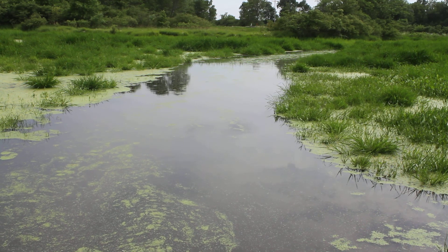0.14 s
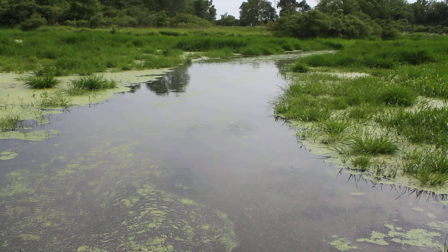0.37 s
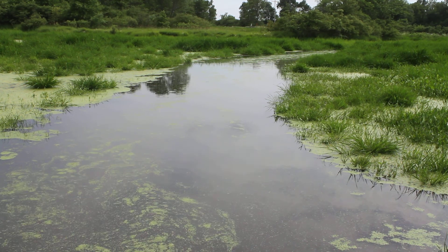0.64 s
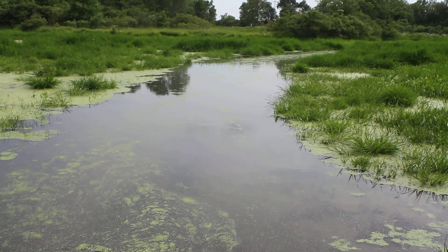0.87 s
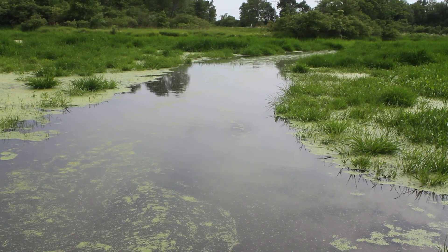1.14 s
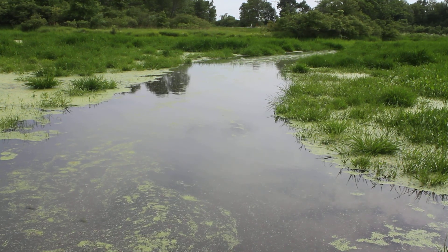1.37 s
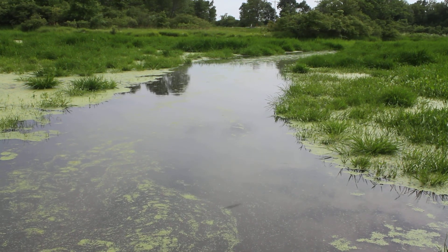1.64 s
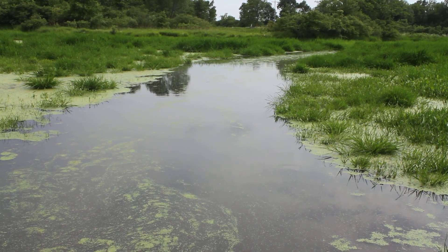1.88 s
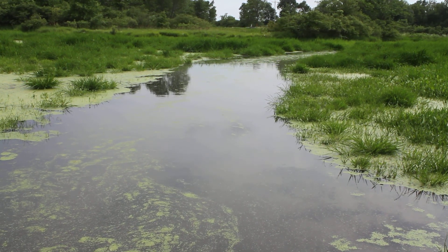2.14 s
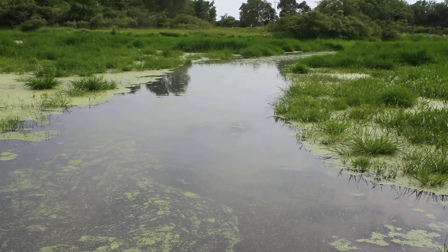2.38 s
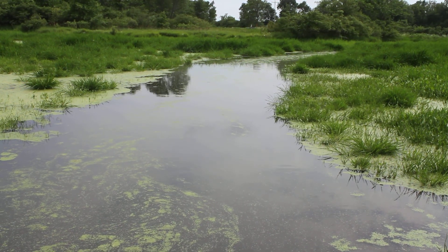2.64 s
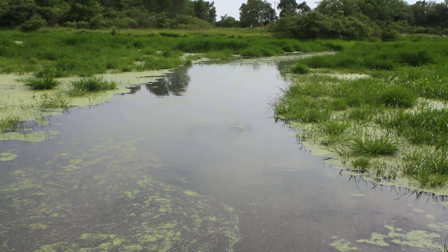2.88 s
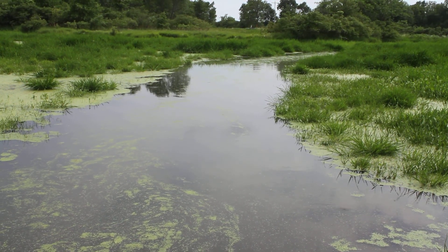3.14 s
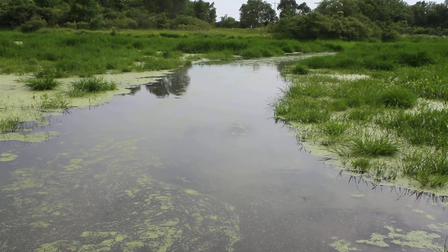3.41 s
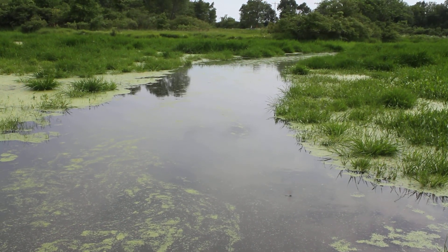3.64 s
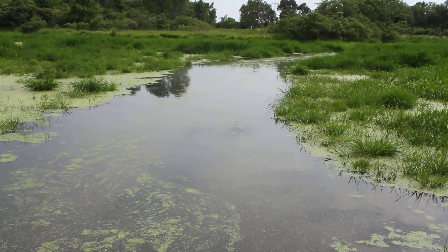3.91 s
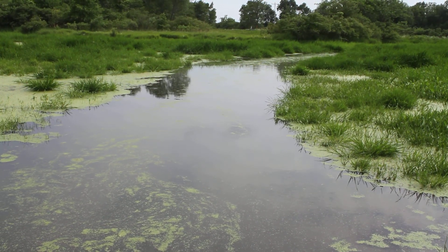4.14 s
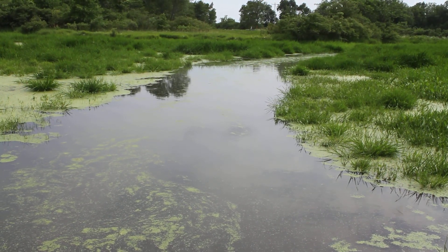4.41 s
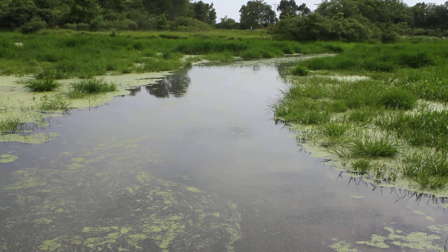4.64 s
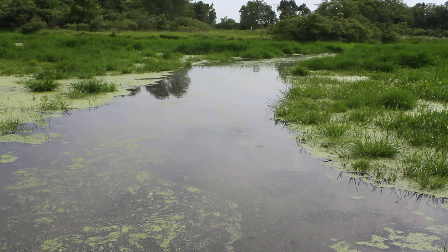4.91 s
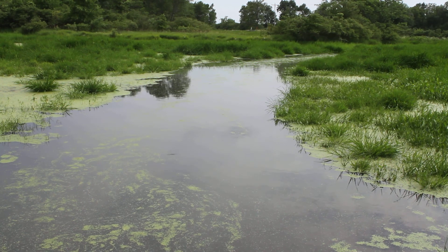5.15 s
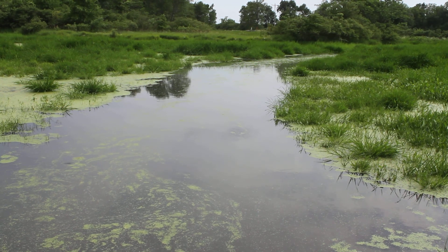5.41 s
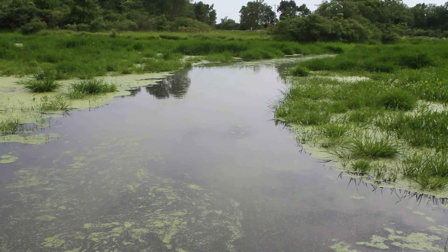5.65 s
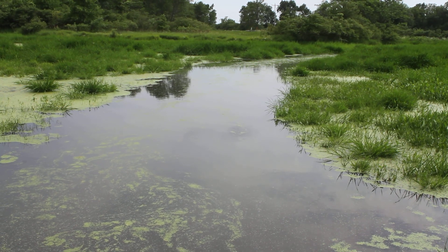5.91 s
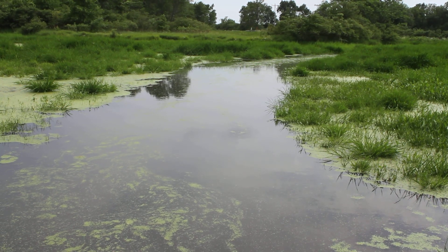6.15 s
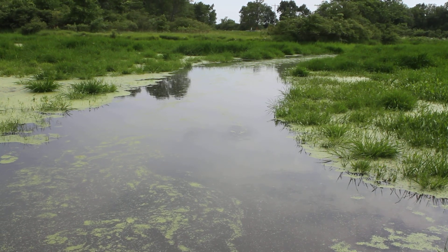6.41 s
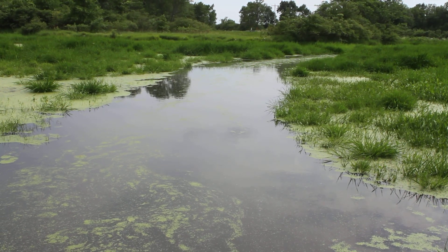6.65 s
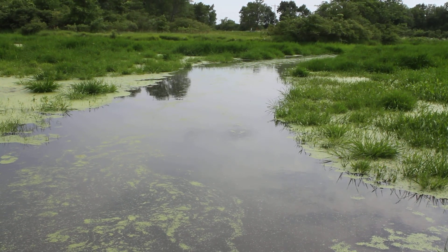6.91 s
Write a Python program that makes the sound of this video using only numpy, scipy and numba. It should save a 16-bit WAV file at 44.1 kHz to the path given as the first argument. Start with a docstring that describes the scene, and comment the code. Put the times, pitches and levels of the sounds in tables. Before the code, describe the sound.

A marshy pond with birds, insects and breeze, heard in mono by one small microphone for about seven seconds. A falling whistle opens at 0 s, followed by soft short whistles up to 1.2 s. From 1.3 to 2.9 s one songbird repeats a quick phrase of sliding, arching and rising syllables, growing louder. Between 3.5 and 4.9 s a second singer repeats a sharper phrase of dot, peak and downward slash. Thin high trills come near 4.1, 4.5 and 6.6 s, a short buzz at 5.5 s, and stray whistles to the end, all with brief diffuse echo over faint far twitter. Insects hiss and rasp steadily very high, with smoother chirring below. A tick and low thump knock the microphone at 2.76 s. Wind starts nearly absent, buffets from 2.5 s, and rumbles in deep irregular puffs, strongest around 5.7-6.7 s.

```python
"""Two songbirds repeat three-syllable phrases by a still pond in a grassy marsh, heard by one small microphone.
Other birds drop single whistles, trills and a buzz; every bird is a gliding near-sine with a scattered echo.
Insects rasp and hiss in the grass, as coloured noise with a few near scrapers in bands of their own.
Gusts buffet the microphone with low noise round a moving centre, and its housing gets one knock.
Behind it all, shaped noise makes the breeze in grass and far trees."""
import sys
import numpy as np
from scipy import signal
from scipy.fft import rfft, irfft
from scipy.io import wavfile
from scipy.ndimage import uniform_filter1d
from numba import njit

SR = 44100
rng = np.random.default_rng(int(sys.argv[2]) if len(sys.argv) > 2 else 0)


def store_wav(level_fs):
    """Save 16-bit WAV to argv[1]."""
    pcm = np.round(np.clip(np.atleast_2d(level_fs), -1, 1) * 32767)
    wavfile.write(sys.argv[1], SR, pcm.T.astype(np.int16))


def elevation(decibels):
    """Turn decibel levels (scalar or array-like) into linear amplitude ratios."""
    levels = np.asarray(decibels, float)
    return 10 ** (levels / 20)


N = 310464
T = np.arange(N) / SR


def unit(x):
    """Scale to rms 1."""
    return x / np.sqrt(np.mean(x ** 2))


def colour(x, spectrum):
    """Shape x by (Hz, dB) points, joined on a logarithmic frequency scale; rms 1."""
    hz, db = np.transpose(spectrum)
    f = np.arange(N // 2 + 1) * SR / N + 1
    gain = elevation(np.interp(np.log(f), np.log(hz), db))
    return unit(irfft(rfft(x) * gain, N))


def walk(rate):
    """Random levels held 1 / rate seconds and slewed twice; rms 1."""
    hold = int(SR / rate)
    steps = np.repeat(rng.standard_normal(N // hold + 1), hold)
    slewed = uniform_filter1d(uniform_filter1d(steps, hold), hold)
    return unit(slewed[:N])


@njit
def svf(x, hz, q):
    """State-variable band-pass whose centre may move every sample."""
    y, band, low = np.empty(len(x)), 0., 0.
    for i in range(len(x)):
        g = np.tan(np.pi * hz[i] / SR)
        v = (band + g * (x[i] - low)) / (1 + g * (g + 1 / q))
        band, low, y[i] = 2 * v - band, low + 2 * g * v, v / q
    return y


def add_whistle(out, note, pulse_hz=0, sweep_hz=0):
    """Add a near-sine along (s, Hz, dB rms) rows; a pulsed one breaks into short upward sweeps."""
    fade_s, smooth_s = .004, .004
    s, hz, db = np.transpose(note)
    first, last = max(s[0] - fade_s, 0), s[-1] + fade_s
    i = np.arange(int(first * SR), min(int(last * SR), N))
    t = T[i]
    edge = np.clip(np.minimum(t - s[0], s[-1] - t) / fade_s + 1, 0, 1) ** 2
    beat = 2 * np.pi * pulse_hz * (t - s[0])
    glide = uniform_filter1d(np.interp(t, s, hz), int(smooth_s * SR) + 1)
    pitch = glide + sweep_hz * signal.sawtooth(beat)
    pulse = 1 - .7 * np.cos(beat) * (pulse_hz > 0)
    gain = edge * elevation(np.interp(t, s, db)) * pulse
    out[i] += np.sqrt(2) * gain * np.sin(2 * np.pi * np.cumsum(pitch) / SR)


def swell(start, length, first_hz, last_hz, db):
    """Rows (s, Hz, dB) of a straight glide that swells to its peak and fades."""
    share = np.array([0, .45, 1])  # of the length; the peak comes a little before the middle
    below_peak_db = np.array([-7, 0, -6])
    return np.c_[start + length * share, first_hz + (last_hz - first_hz) * share, db + below_peak_db]


def sing_phrases(song):
    """The two singers and a third bird's long fall: each syllable is a fixed pitch contour, sung again and again."""
    # Syllables: arch, rise, slide of one singer; dot, peak, slash of the other; then the long fall.
    # Each row: time from the start in seconds, pitch in Hz before the factor below, level in dB re the singing.
    shapes = [
        [(0, 3480, -6), (.012, 4140, 0), (.022, 4450, 0.5), (.032, 4270, 1), (.042, 3090, -8)],
        [(0, 3640, -5), (.01, 4220, -1), (.022, 4480, 0), (.036, 4700, -12)],
        [(0, 5350, -14), (.02, 5170, -7), (.045, 4880, -6), (.065, 4220, 3), (.085, 3770, 2.5),
         (.105, 3350, -4.5), (.15, 3000, -18)],
        [(0, 3740, -9), (.012, 3820, 3), (.026, 3800, -14)],
        [(0, 4230, -11), (.016, 4290, 0), (.026, 4420, -9), (.034, 4750, -5), (.048, 5900, -13),
         (.06, 4630, -3), (.072, 4150, 0), (.085, 3950, -13)],
        [(0, 4790, -13), (.008, 4480, 3), (.018, 3560, 2)],
        [(0, 3030, -17), (.038, 2920, -12), (.058, 2760, -2), (.09, 2670, 0), (.148, 2570, -8),
         (.188, 2510, -13)],
    ]
    # When each syllable is sung, one list a shape. Each row: start in seconds, level in dB before flutter,
    # pitch factor, reach in dB per kHz away from 4 kHz.
    sung = [
        [(1.538, -54, 1.01, 0), (1.896, -46, .99, 0), (2.265, -43, 1.0, 0), (2.643, -41, 1.0, 0)],
        [(1.594, -52, .97, 0), (1.961, -46, .99, 0), (2.331, -43, .99, 0), (2.71, -40, 1.0, 0)],
        [(1.322, -51, .96, -13), (1.692, -50, .96, -1), (2.047, -49, .98, 2), (2.428, -49, 1.0, 2),
         (2.794, -42, 1.0, 0)],
        [(3.562, -52, 1.01, 0), (3.96, -45, 1.01, 0), (4.347, -45, 1.0, 0)],
        [(3.63, -57, 1.02, -3), (4.021, -45, 1.0, 0), (4.408, -46, 1.0, 0), (4.803, -47, .99, 2)],
        [(3.771, -50, .99, 0), (4.161, -49, 1.0, 0), (4.548, -50, 1.01, 0), (6.738, -52, 1.01, 0)],
        [(.014, -46, 1.0, 0)],
    ]
    for shape, times in zip(shapes, sung):
        for s, db, factor, reach_db in times:
            note = np.array(shape) * [1, factor, 1] + [s, 0, db]
            # a negative reach weakens the highest and lowest pitches most
            note[:, 2] += reach_db * np.abs(note[:, 1] / 1000 - 4)
            add_whistle(song, note)


def call_singly(song):
    """Other birds: single gliding whistles, thin trills and one buzz, the last two broken into pulses."""
    # Birds at various distances. Each row of all three: start in seconds, length in seconds,
    # first pitch in Hz, last pitch in Hz, peak level in dB before pulses and flutter.
    whistles, trills = [(.2, .06, 4650, 5150, -61), (.275, .045, 5200, 4650, -56),
                        (.73, .025, 3850, 4350, -54), (.778, .037, 4050, 3650, -53),
                        (.862, .025, 2920, 3020, -48), (.865, .038, 3950, 2950, -53),
                        (.885, .055, 2080, 2200, -56), (.975, .035, 3950, 2950, -55),
                        (.985, .085, 2190, 2350, -54), (1.085, .018, 2130, 2600, -52),
                        (1.162, .03, 2320, 2340, -54), (1.476, .025, 3310, 3620, -51),
                        (1.883, .025, 4490, 3860, -48), (1.94, .04, 2870, 2960, -48),
                        (1.987, .023, 4600, 3980, -48), (3.106, .045, 3150, 3330, -53),
                        (3.694, .022, 4450, 4060, -45), (3.905, .02, 2650, 2650, -58),
                        (3.96, .045, 3000, 2550, -57), (4.69, .016, 6500, 5750, -59),
                        (4.701, .035, 2920, 3580, -53), (5.243, .025, 6900, 5710, -60),
                        (5.675, .035, 2550, 3200, -59), (5.72, .02, 3500, 3200, -54),
                        (5.85, .03, 4450, 3600, -45), (5.992, .022, 2960, 3030, -57),
                        (6.075, .027, 3250, 3400, -57), (6.455, .05, 4250, 3450, -55),
                        (6.553, .015, 4000, 3650, -47), (6.625, .017, 4100, 3850, -53),
                        (6.745, .023, 2620, 2650, -59), (6.86, .013, 3960, 3500, -50)], [(4.095, .167, 6420, 6770, -63), (4.52, .165, 6520, 6800, -60),
                                          (6.565, .165, 6450, 6570, -64)]
    buzz = (5.51, .062, 3550, 3600, -47)  # a single row
    for row in whistles:
        add_whistle(song, swell(*row))
    for row in trills:
        add_whistle(song, swell(*row), pulse_hz=45, sweep_hz=90)
    add_whistle(song, swell(*buzz), pulse_hz=124, sweep_hz=170)


def twitter():
    """Faint short chirps, mostly falling, scattered at random in time, from many birds far off."""
    count, loudest_db, middle_hz, spread, glide = 90, -59, 3750, .09, .12
    out = np.zeros(N)
    draws = np.c_[rng.random((count, 3)), rng.standard_normal((count, 2))]
    for when, long, soft, high, slope in draws:
        s = when * T[-1] + np.array([0, .5, 1]) * (.012 + .03 * long)
        pitch = middle_hz * np.exp(spread * high)
        hz = pitch * np.exp(glide * (slope - .6) * np.array([-.5, 0, .5]))
        db = loudest_db - 6 * soft - np.array([5, 0, 5])
        add_whistle(out, np.c_[s, hz, db])
    return out


def scatter_back(song):
    """Echo from reeds and trees: a decaying burst of random reflections."""
    echo_db, t60_s, rise_s = -5, .3, .006
    t = T[:SR // 2]
    paths = rng.standard_normal(len(t)) * elevation(-60 * t / t60_s) * np.clip(t / rise_s, 0, 1)
    paths = paths / np.sqrt(np.sum(paths ** 2))
    # swaying reeds keep reshuffling the paths, so the echo is a smear with no fixed colour
    return elevation(echo_db) * signal.fftconvolve(song * walk(400), paths)[:N]


def birds():
    """All voices; moving air makes them flutter, reeds and trees scatter them back."""
    song = twitter()
    sing_phrases(song)
    call_singly(song)
    song = song * elevation(2.1 * walk(150) + .6 * walk(35))
    return song + scatter_back(song)


def rasping():
    """A smooth mass of insects; a few near ones scrape about forty times a second, each in its own band."""
    # The mass in the grass. Each row: frequency in Hz, relative density in dB.
    mass_spectrum = [(4000, -38), (6800, -15.5), (7750, -6.5), (8450, -10.5), (9120, -8), (9800, -5),
                     (10400, .5), (11800, -.6), (13500, -5.5), (15100, -8), (15700, -9)]
    # Near insects. Each row: band centre in Hz, band width in Hz, level in dB re one another.
    raspers = [(10400, 700, 0), (10900, 1500, 0), (11800, 1800, -2), (13200, 3000, -6)]
    rate_hz, rate_spread, depth, near_db = 40, .04, .7, -4.5  # near_db: all near ones re the mass
    near = 0
    for hz, width, db in raspers:
        strokes = np.cumsum(rate_hz * (1 + rate_spread * walk(1.5))) / SR + rng.random()
        stroke_gain = 1 + depth * np.sin(2 * np.pi * strokes)
        scrape = stroke_gain * elevation(3 * walk(1.2)) * rng.standard_normal(N)
        near = near + elevation(db) * unit(svf(scrape, np.full(N, 1. * hz), hz / width))
    mass = colour(rng.standard_normal(N), mass_spectrum)
    return unit(mass + elevation(near_db) * unit(near))


def insects():
    """The near rasp high up and a smooth far chorus lower down, each following its own slow level."""
    # Choruses. Each row: time in seconds, near rasp level in dB, far chirr level in dB.
    chorus = [(0, -42.5, -51.5), (.9, -42, -50.5), (2.1, -42, -52.5), (2.43, -39.5, -50),
              (2.7, -41.2, -51.5), (3.4, -41.2, -53.7), (4.74, -42.4, -51.5), (4.92, -42, -50.5),
              (5.04, -43.5, -53), (5.5, -42, -53), (5.9, -42, -54), (6.6, -42, -53.5), (7.04, -44, -55)]
    # Far chirring. Each row: frequency in Hz, relative density in dB.
    chirr_spectrum = [(1590, -36), (2700, -10.5), (3870, 2.5), (4160, 0), (4770, -11.5), (5400, -14.5),
                      (7020, -23), (11900, -120)]
    s, near_db, far_db = np.transpose(chorus)
    far = colour(rng.standard_normal(N), chirr_spectrum) * elevation(.8 * walk(9))
    return rasping() * elevation(np.interp(T, s, near_db)) + far * elevation(np.interp(T, s, far_db))


def gusts():
    """Gain and rumble centre of the flow with its buffets; the strongest weighs most in the centre."""
    # Steady flow over the microphone port. Each row: time in seconds, level in dB.
    flow = [(0, -72), (1.9, -66), (2.1, -59), (2.79, -55), (3.14, -57), (3.3, -51), (3.6, -51), (4.86, -52),
            (5.23, -52), (5.5, -50), (5.95, -46.5), (6.32, -47.5), (6.62, -46.5), (7.04, -53)]
    # Buffets within the gusts. Each row: start in seconds, hold in seconds, level in dB, rumble centre in Hz.
    buffets = [(2.52, .03, -49, 60), (2.6, .06, -47, 85), (2.92, .015, -53, 60), (3.24, .03, -48, 130),
               (3.5, .06, -42, 84), (3.78, .02, -45, 110), (3.87, .035, -41, 195), (4.01, .09, -41, 75),
               (4.2, .02, -46, 85), (4.33, .02, -48, 75), (4.405, .03, -43, 150), (4.46, .07, -40, 80),
               (4.695, .07, -41, 135), (4.84, .03, -44, 140), (4.91, .015, -43, 88), (5.41, .02, -48, 90),
               (5.56, .02, -44, 94), (5.69, .07, -39, 80), (5.82, .08, -39, 91), (6.3, .035, -43, 90),
               (6.08, .03, -46, 150), (6.39, .015, -46, 116), (6.49, .035, -44, 140), (6.62, .1, -40, 92),
               (6.735, .055, -41, 135), (6.91, .015, -43, 80)]
    flow_hz, rise_db_per_s, fall_db_per_s = 76, 450, 350
    power = elevation(np.interp(T, *np.transpose(flow))) ** 2
    weighted_hz = power * flow_hz
    for s, hold, db, hz in buffets:
        before_s, after_s = np.clip(s - T, 0, None), np.clip(T - s - hold, 0, None)
        puff = elevation(db - rise_db_per_s * before_s - fall_db_per_s * after_s) ** 2
        power, weighted_hz = power + puff, weighted_hz + puff * hz
    return np.sqrt(power), weighted_hz / power


def wind():
    """Eddies over the port: rumble round a moving centre, flickering within each gust."""
    # Broad part of the wind noise. Each row: frequency in Hz, relative density in dB.
    broad_spectrum = [(12, -40), (22, -6), (45, 0), (86, -.5), (130, -3.5), (210, -10.5), (420, -27),
                      (900, -39), (2000, -70)]
    q, broad_gain, flicker_db = 1.4, 1.1, 2.1
    gain, centre_hz = gusts()
    once = svf(rng.standard_normal(N), centre_hz, q)
    eddies = unit(svf(once, centre_hz, q))
    flow = eddies + broad_gain * colour(rng.standard_normal(N), broad_spectrum)
    return unit(flow * elevation(flicker_db * walk(25))) * gain


def knock():
    """A tap on the housing: a bright tick, then a thump whose pitch drops as it spreads."""
    # Two decaying sines. Each row: start in seconds, pitch in Hz, starting level in dB peak, t60 in seconds.
    tick, thump = (2.7628, 1600, -31, .005), (2.764, 125, -27.5, .06)
    extra_turns, settle_s = .44, .0007  # the thump starts higher by these cycles, spent as it settles
    out = 0
    for (s, hz, db, t60), turns, sign in ((tick, 0, -1), (thump, extra_turns, 1)):
        t = np.clip(T - s, 0, None)
        cycles = hz * t + turns * (1 - np.exp(-t / settle_s))
        out = out + sign * elevation(db - 60 * t / t60) * np.sin(2 * np.pi * cycles)
    return out


def air():
    """Distant rustle: shaped noise that swells and flickers a little."""
    # Breeze in grass and far trees. Each row: frequency in Hz, relative density in dB.
    rustle_spectrum = [(15, -38), (30, -15), (60, -4), (145, 1), (250, -2), (450, -1.5), (680, -3.5),
                       (950, -8.5), (1120, -6.5), (1450, -10), (2000, -10), (2400, -13), (6300, -13.5),
                       (8000, -17), (16000, -44)]
    stirred = rng.standard_normal(N) * elevation(.6 * walk(14) + .3 * walk(1.5))
    return colour(stirred, rustle_spectrum) * elevation(-51.3)


def scene():
    """One microphone feeds both channels."""
    mix = birds() + insects() + wind() + knock() + air()
    return np.tile(mix, (2, 1))


def roll_off(x):
    """The treble ends steeply here."""
    return signal.sosfilt(signal.butter(12, 16540, fs=SR, output="sos"), x)


def record(dry):
    """The top of the microphone signal is cut off sharply at 15740 Hz."""
    keep = np.arange(N // 2 + 1) * SR / N < 15740
    mix = irfft(rfft(dry) * keep, N)
    return roll_off(mix)


dry = scene()
out = record(dry)
store_wav(out)
```